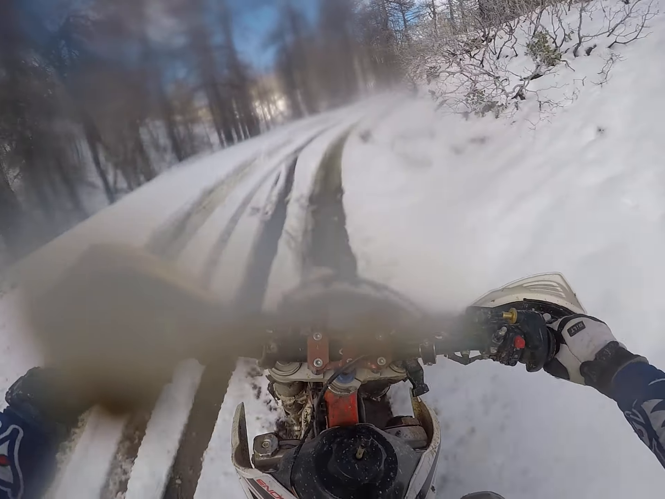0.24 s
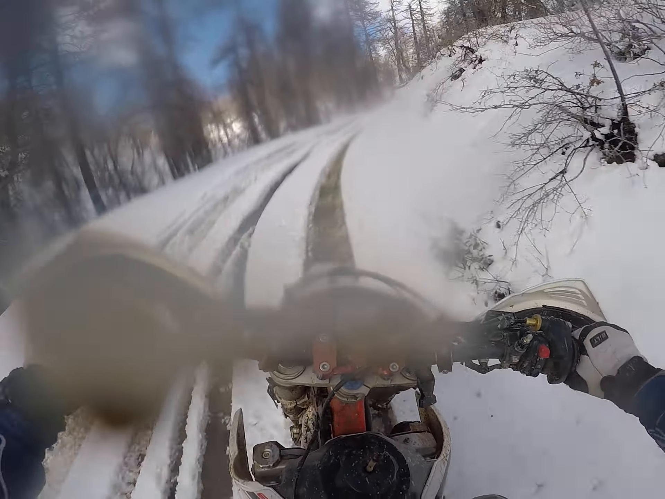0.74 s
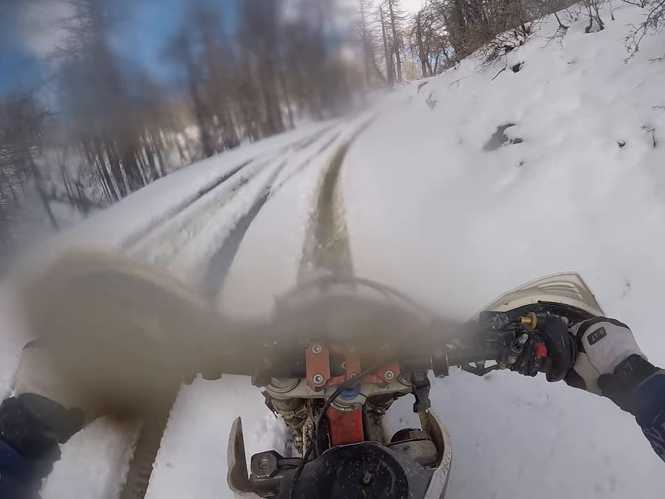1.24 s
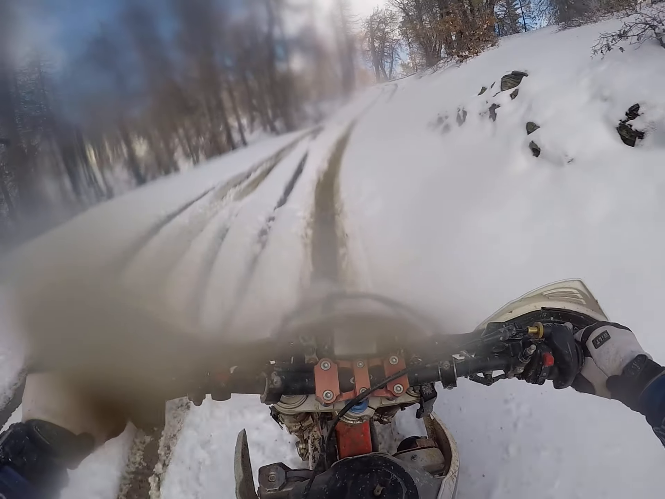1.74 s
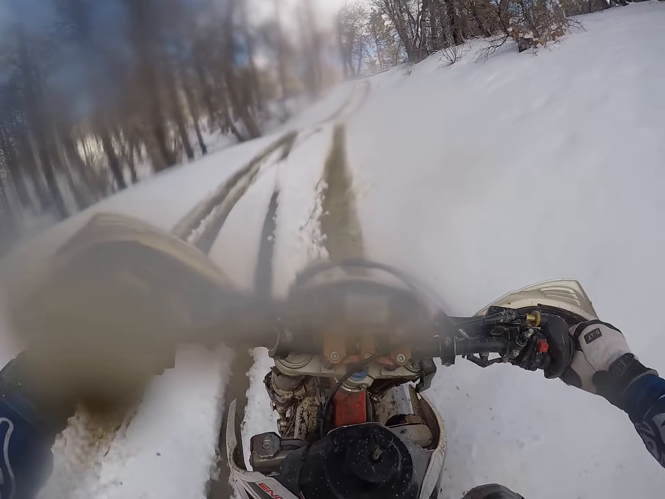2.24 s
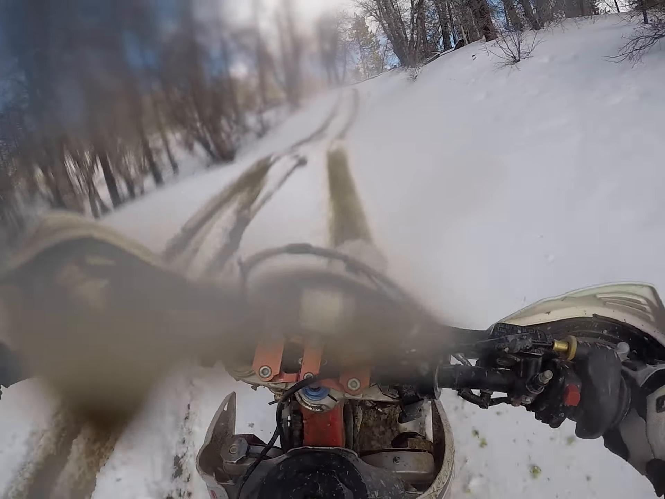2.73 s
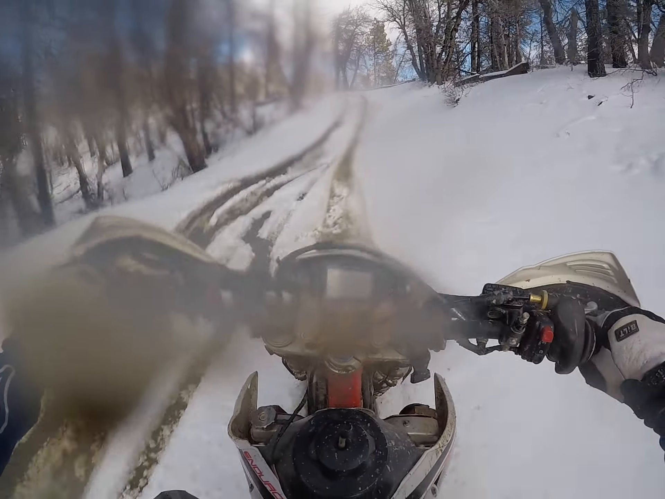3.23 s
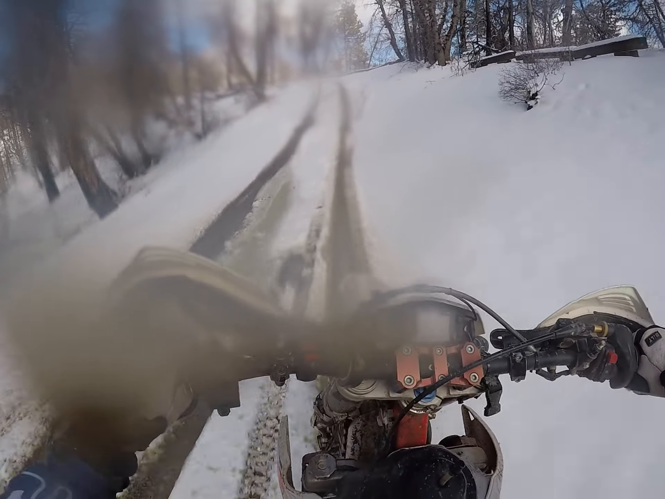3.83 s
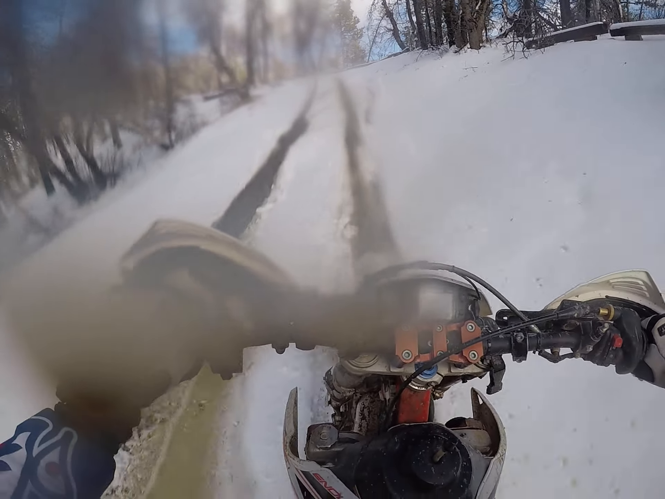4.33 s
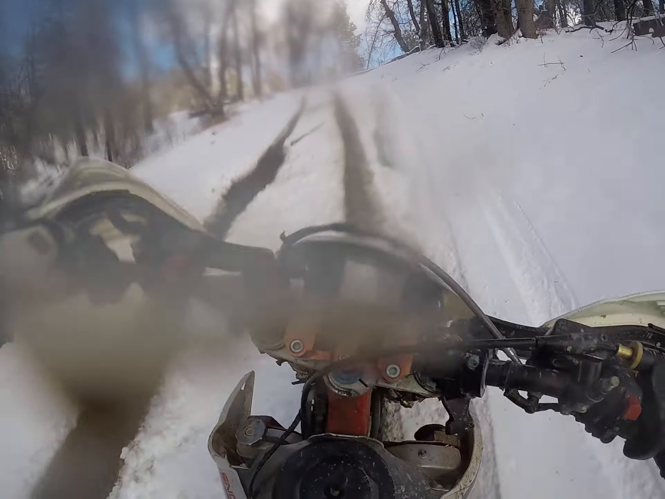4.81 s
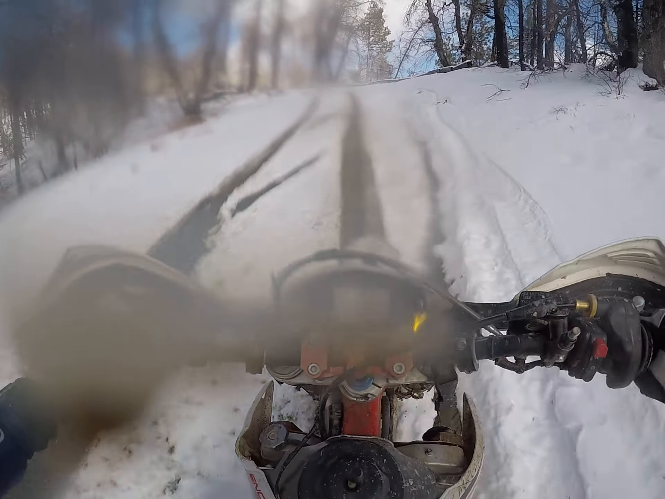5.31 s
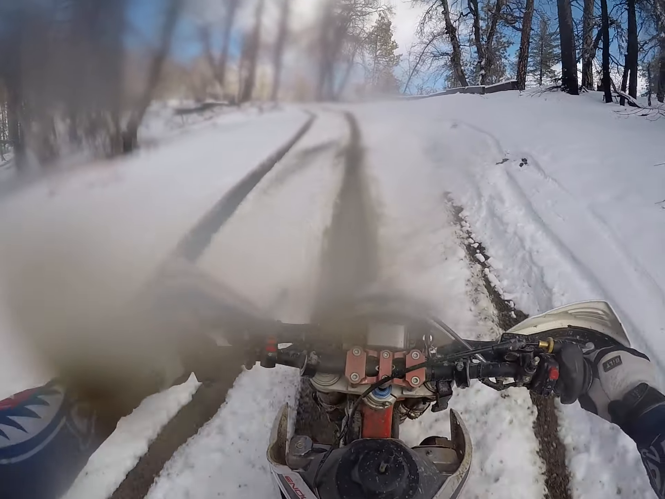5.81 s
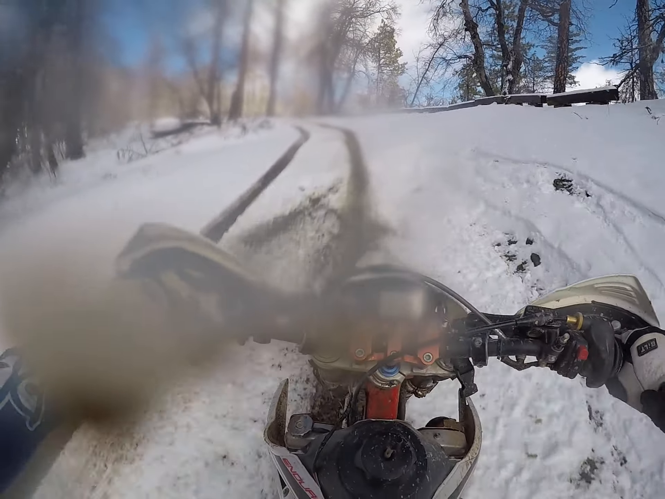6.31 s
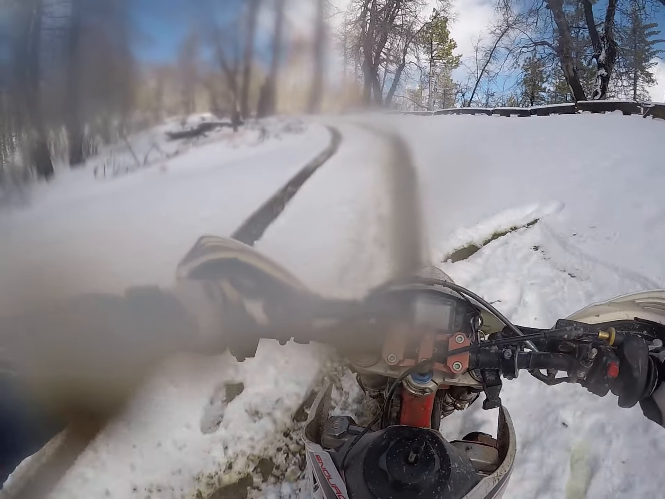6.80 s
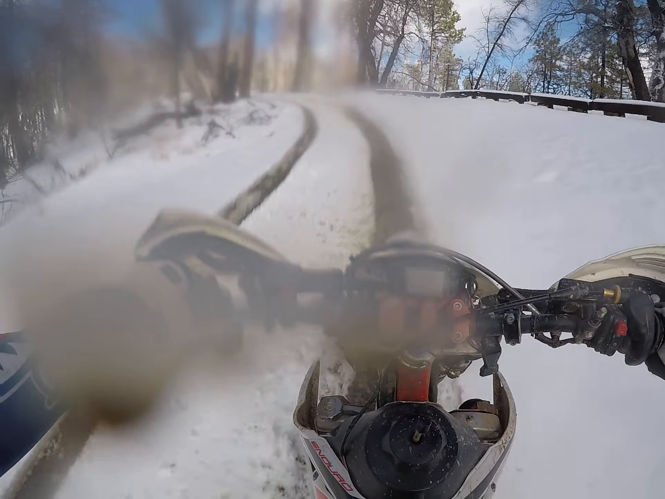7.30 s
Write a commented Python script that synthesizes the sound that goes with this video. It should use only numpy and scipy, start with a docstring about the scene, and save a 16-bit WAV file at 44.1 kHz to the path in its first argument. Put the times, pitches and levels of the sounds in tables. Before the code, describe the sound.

Close at the rider's helmet, a single-cylinder four-stroke dirt bike thuds along a snowy forest track. Hollow exhaust pulses run almost continuously over deep crank throb, with valve clatter, gassy hiss and faint metallic whine. Around two and a half seconds the throttle snaps with a honking intake and sharper cracks; another short snap comes near four and a half. Wind buffets low, and small grains of snow tick against the bike.

```python
"""A single-cylinder four-stroke trail bike pulls along a snowy track, heard at two helmet microphone ports.
Each firing is a set of decaying tone bursts: a valve thump, then a blast echoing in the header pipe,
with an airbox honk that rises on throttle snaps; slow sines add the crank throb.
Noise and random taps clatter and whine in the engine cases; thin, high, steady tones flicker in briefly.
Short bright noise bursts are snow spray, and lumpy low noise is wind buffeting the ports."""
import sys
import numpy as np
from scipy import signal
from scipy.fft import rfft, irfft, next_fast_len
from scipy.io import wavfile
from scipy.ndimage import uniform_filter1d, minimum_filter1d

SR = 44100
rng = np.random.default_rng(int(sys.argv[2]) if len(sys.argv) > 2 else 0)


def inscribe(sig):
    """Save sig as 16-bit PCM at rate SR to the path in sys.argv[1].

    A 1-D sig is mono; a 2-D sig holds one channel per row.
    Samples are clipped to [-1, 1] before scaling.
    """
    pcm = np.round(np.clip(np.atleast_2d(sig).T, -1, 1) * 32767)
    wavfile.write(sys.argv[1], SR, pcm.astype(np.int16))


N = 332955  # samples

# Engine speed. Each row: time in seconds, firings per second.
ENGINE_SPEED = [(0.0, 36.87), (0.16, 36.45), (0.32, 36.85), (0.4, 37.6), (0.48, 36.15), (0.76, 34.16),
                (0.92, 34.61), (1.24, 34.42), (1.32, 35.72), (1.64, 33.29), (1.76, 33.54), (1.88, 34.52),
                (2.24, 33.95), (2.44, 34.26), (2.52, 36.36), (2.6, 38.93), (2.68, 43.22), (2.76, 44.8),
                (2.88, 39.91), (2.96, 34.74), (3.08, 34.52), (3.16, 36.83), (3.24, 35.0), (3.36, 36.45),
                (3.48, 35.75), (3.56, 34.06), (3.68, 33.69), (3.76, 34.71), (3.88, 33.62), (4.08, 34.62),
                (4.28, 37.64), (4.44, 35.22), (4.56, 36.62), (4.64, 34.75), (4.68, 38.67), (4.72, 43.61),
                (4.76, 45.17), (4.84, 41.08), (4.92, 40.78), (5.16, 36.7), (5.24, 38.66), (5.4, 36.09),
                (5.52, 37.19), (5.6, 36.2), (5.8, 35.78), (5.88, 36.35), (5.96, 39.12), (6.08, 36.87),
                (6.16, 38.73), (6.36, 38.49), (6.52, 39.04), (6.6, 40.18), (6.8, 39.08), (6.88, 37.98),
                (7.08, 35.19), (7.2, 36.88), (7.36, 39.0), (7.55, 37.35)]


def amp(db):
    """Amplitude factor for a level in dB."""
    return 10 ** (np.asarray(db) / 20)


def rms_one(x):
    """Scale a signal to an rms of 1."""
    return x / np.sqrt(np.mean(x ** 2) + 1e-20)


def in_time(rows, t=None):
    """Columns of a curve table at times t (every sample by default)."""
    if t is None:
        t = np.arange(N) / SR
    s, *columns = np.transpose(rows)
    return [np.interp(t, s, column) for column in columns]


def at_hz(points, hz):
    """Read a curve over frequency, straight between its points on a log axis."""
    point_hz, values = np.array(points).T
    return np.interp(np.log(hz), np.log(point_hz), values)


def drift(rate_hz):
    """Slow random wander of spread 1: noise through two equal low-pass poles, made at SR / 40."""
    r = np.exp(-2 * np.pi * rate_hz * 40 / SR)
    settle = 2000
    white = rng.standard_normal(N // 40 + 2 + settle)
    slow = signal.lfilter([1], [1, -2 * r, r * r], white)[settle:]
    return np.interp(np.arange(N) / 40, np.arange(len(slow)), rms_one(slow))


def resonance(x, hz, width_hz):
    """Two-pole peak with gain 1 on top."""
    r = np.exp(-np.pi * width_hz / SR)
    zeros = np.array([1, 0, -1]) * (1 - r * r) / 2
    poles = [1, -2 * r * np.cos(2 * np.pi * hz / SR), r * r]
    return signal.lfilter(zeros, poles, x)


def banded_noise(spectrum, patchy_db, alike_share):
    """Third-octave bands of stereo noise with their own level, flicker and likeness; rms 1 overall."""
    # Left-right likeness before alike_share. Each row: frequency in Hz, correlation (below 0 counts as 0).
    likeness = [(25, 0.05), (60, 0.4), (180, 0.92), (530, -0.88), (1590, 0.031), (4730, 0.72),
                (14100, -0.75)]
    lowest, highest = spectrum[0][0], min(spectrum[-1][0], 16000)
    edges = lowest * 2 ** np.arange(0, np.log2(highest / lowest), 1 / 3)
    together = drift(2.9)
    white = rng.standard_normal((2, 2, N))  # neighbouring bands take turns with two noise pairs
    out = 0
    for k, (low, high) in enumerate(zip(edges, edges[1:])):
        band = signal.butter(2, [low, high], "band", fs=SR, output="sos")
        mid, side = signal.sosfilt(band, white[k % 2])
        hz = np.sqrt(low * high)
        alike = np.clip(alike_share * at_hz(likeness, hz), 0, 1)
        flicker_db = patchy_db * (0.81 * together + drift(18.0))
        stereo = np.sqrt(1 + alike) * mid + np.sqrt(1 - alike) * side * [[1], [-1]]
        out = out + amp(at_hz(spectrum, hz) + flicker_db) * stereo
    return rms_one(out)


def cycles():
    """Engine cycles turned at every sample; whole numbers fall on the blasts."""
    first_blast = .661  # share of a cycle before the first blast
    return np.cumsum(in_time(ENGINE_SPEED)[0]) / SR - first_blast


def moments(turn, at):
    """Times at which the crank passes a given share of each cycle."""
    count = np.arange(-2, int(turn[-1]) + 2) + at
    # cycles beyond either end run on at the end speeds
    before = np.minimum(count - turn[0], 0) / ENGINE_SPEED[0][1]
    after = np.maximum(count - turn[-1], 0) / ENGINE_SPEED[-1][1]
    return np.interp(count, turn, np.arange(N) / SR) + before + after


def wind():
    """Turbulence at the ports: lumpy low noise, mostly its own at each one."""
    # Colour of the buffeting. Each row: frequency in Hz, relative level per Hz in dB.
    colour = [(12, -6), (30, -8), (55, -7.5), (90, -8), (130, -5.5), (200, -8), (300, -11), (500, -36)]
    # Gusts. Each row: time in seconds, average wind level in dB.
    gusts = [(0, -18.5), (1, -20.5), (1.7, -20), (1.86, -17), (2.0, -22), (2.6, -23), (3, -25.5),
             (3.7, -21.5), (5, -25), (6, -25), (6.35, -22), (6.8, -21.5), (7.55, -23)]
    return amp(in_time(gusts)[0]) * banded_noise(colour, patchy_db=2.0, alike_share=0.44)


def spray():
    """Snow and grit flung against the bike: sudden bright noise bursts, unlike at the two ports."""
    # Each row: start in seconds, level at the onset in dB.
    hits = [(0.2635, -30), (2.149, -39), (2.6892, -35), (2.877, -34), (3.134, -27.5), (3.349, -42),
            (3.7, -38), (4.0492, -45), (6.9726, -45)]
    fall_ms = 8.6
    t = np.arange(N) / SR
    bursts = sum(amp(db) * (t > s) * np.exp(-1000 * np.abs(t - s) / fall_ms) for s, db in hits)
    return bursts * rms_one(resonance(rng.standard_normal((2, N)), hz=6460, width_hz=480))


def high_tones():
    """Thin, high, steady tones flicker in for short spells: noise in narrow, twice-filtered resonances."""
    # Spells of the tones. Each row: middle in seconds, length in seconds, level in dB.
    spells = [(0.348, 0.026, -54), (0.551, 0.017, -57), (1.597, 0.068, -56), (2.191, 0.017, -62),
              (2.848, 0.061, -58), (3.672, 0.1, -54), (3.751, 0.037, -48), (3.903, 0.035, -57),
              (4.0, 0.12, -63), (4.669, 0.043, -50)]
    # Tones. Each row: pitch in Hz, width of each filter in Hz, relative level in dB.
    tones = [(8260, 30, 9), (10780, 25, -5), (13100, 60, -17), (14750, 25, -19)]
    t, white = np.arange(N) / SR, rng.standard_normal(N)
    spell_level = sum(amp(db) * np.exp(-.5 * ((t - s) / (length / 2)) ** 2) for s, length, db in spells)
    tones_sum = 0
    for hz, width_hz, db in tones:
        tone = resonance(resonance(white, hz, width_hz), hz, width_hz)
        tones_sum = tones_sum + amp(db) * rms_one(tone)
    return spell_level * tones_sum


def valve_taps():
    """Dense taps of random size at random moments."""
    taps_per_s = 900
    taps = (rng.random(N) < taps_per_s / SR) * rng.standard_normal(N)
    return taps + 1e-18  # keeps the filters off denormal numbers


def whine():
    """Three case panels sing: dense taps in narrow resonances, each in its own spells."""
    # Each row: time in seconds, low, middle and high panel level in dB.
    spells = [(0, -52, -42.5, -50), (1, -50, -41.5, -48), (1.7, -47, -46, -43), (2.2, -48, -42, -44),
              (2.65, -55, -41, -52), (3.3, -55, -41.5, -50), (3.7, -45, -45, -48), (3.9, -44, -44, -43),
              (4.15, -43, -40.5, -47), (4.42, -42, -35.5, -47), (4.6, -42, -39, -43), (4.7, -57, -50, -60),
              (4.9, -48, -46, -53), (5.4, -47, -48, -48), (6.5, -46.5, -44, -46), (7.55, -53, -43, -50)]
    # Each row: panel pitch in Hz, width in Hz.
    panels = [(2260, 70), (2885, 65), (3520, 70)]
    out = 0
    for db, (hz, width_hz) in zip(in_time(spells), panels):
        waver_db = 1.5 * drift(2.5)
        out = out + amp(db + waver_db) * rms_one(resonance(valve_taps(), hz, width_hz))
    return out


def case_taps():
    """Valve taps striking the resonances of the engine cases, each wavering slowly."""
    # Each row: pitch in Hz, width in Hz, relative level in dB.
    case_modes = [(1726, 140, -9), (3114, 320, -13.5), (4085, 86, -15.5), (4446, 58, -14.5)]
    out = 0
    for hz, width_hz, db in case_modes:
        out = out + amp(db + 2.0 * drift(2.1)) * rms_one(resonance(valve_taps(), hz, width_hz))
    return out


def clatter(turn):
    """Gas hiss, valve taps and panel whine, all swelling in step with the crank."""
    # Colour of the hiss. Each row: frequency in Hz, relative level per Hz in dB.
    colour = [(240, -39), (400, -5), (477, -11), (561, -9), (823, -12), (1100, -7.5), (1460, -21.5),
              (2630, -18.5), (2880, -22.5), (6660, -23), (10400, -46), (12500, -79), (13500, -92)]
    # Level of hiss and taps before their own gains. Each row: time in seconds, level in dB.
    course = [(0, -33), (1.3, -32), (2.3, -32.5), (2.58, -30.5), (2.66, -32.5), (2.85, -31), (3.0, -33.5),
              (3.4, -31.5), (4.0, -31.5), (4.65, -31), (4.72, -35.5), (4.85, -31), (5.0, -34),
              (5.35, -31.5), (6.5, -32), (7.55, -33.5)]
    # Swell within the cycle. Each row: order, depth in dB, crest in cycles after the blast.
    swells = [(1, 1.5, -0.13), (2, 1.1, 0.1)]
    swell_db = sum(db * np.cos(2 * np.pi * order * (turn - crest)) for order, db, crest in swells)
    hiss = amp(5.8) * banded_noise(colour, patchy_db=1.12, alike_share=0.69)
    level = amp(in_time(course)[0])
    return amp(swell_db) * (level * (hiss + case_taps()) + whine())


def dull(x):
    """Steep roll-off at which hiss and spray stop, near 13.6 kHz."""
    return signal.sosfilt(signal.cheby2(8, 45, 13600, fs=SR, output="sos"), x)


def throb(turn):
    """Crank throb through the frame: the lowest orders, near sines that waver in strength."""
    # Each row: order, rms level in dB about which it wavers, crest in cycles after the blast.
    orders = [(1, -25.5, 0.32), (2, -24.5, 0.24), (3, -35, 0.19)]
    out = 0
    for order, db, crest in orders:
        level = np.sqrt(2) * amp(db + 0.5 * drift(2.4))
        out = out + level * np.cos(2 * np.pi * order * (turn - crest))
    return out


def rings(times, sizes, hz, rise_ms, fall_ms):
    """A tone burst cresting at each time: bell-shaped rise, then a fall with an exponential tail."""
    out = np.zeros(N + 2 * SR)  # a spare second at each end
    span = np.arange(-int(SR * rise_ms / 300), int(SR * fall_ms / 130))
    for t, size, f in zip(times, sizes, hz):
        i = int(t * SR) + span
        age = i / SR - t
        rise = np.exp(-.5 * (1000 * age / rise_ms) ** 2)
        fall = 1 / np.cosh(1000 * age / fall_ms)
        shape = np.where(age < 0, rise, fall)
        out[i + SR] += size * shape * np.cos(2 * np.pi * f * age)
    return out[SR:SR + N]


def part_levels(firings):
    """Level in dB of each exhaust and intake part at each firing, and the thump's delay in ms."""
    # Load on the engine. Each row: time in seconds, levels in dB of blast, first thump, airbox honk,
    # silencer ring and gas jet.
    load = [(0.02, -7.5, -9.5, -35, -21.5, -26.5), (0.45, -10.5, -12, -32, -27.5, -29.5),
            (0.51, -17.5, -10.5, -23, -26, -30), (0.71, -9.5, -13.5, -21, -22.5, -32),
            (0.88, -8.5, -8, -19, -20.5, -24.5), (1.06, -11, -11.5, -30, -22.5, -27),
            (1.29, -7.5, -5.5, -21.5, -28, -25.5), (1.46, -13.5, -8, -26, -23, -31),
            (1.75, -12.5, -10.5, -26.5, -27.5, -26), (2.05, -12, -6, -24, -26.5, -23.5),
            (2.22, -7.5, -10, -26, -21.5, -26), (2.51, -5.5, -4, -14.5, -38, -27),
            (2.64, -10, -3, -3.5, -36, -42), (2.74, -8, -8, -21.5, -20, -29),
            (2.8, -6, -3, -13, -20.5, -28.5), (2.88, -15.5, -16.5, -26, -23.0, -33),
            (2.96, -9, -13, -19, -18, -34), (3.27, -7.5, -2, -13.5, -24.5, -27.5),
            (3.32, -9.5, -8.5, -16, -25, -26.5), (3.61, -10.5, -9.5, -38.5, -16.5, -34),
            (3.9, -14.5, -7.5, -28, -25.5, -32), (4.07, -8, -5, -19, -19, -26.5),
            (4.19, -10.5, -3.5, -15, -23.5, -29.5), (4.55, -11, -9.0, -19.5, -19, -28.0),
            (4.71, -2.5, -3.5, 0.5, -31, -30), (4.75, -14.5, -7.0, -14, -22.5, -32.0),
            (4.8, -9, -19, -50, -23, -28.5), (4.9, -7, -12, -27, -25, -28.5),
            (5.07, -17.5, -10.5, -27, -32, -32), (5.23, -11, -10.5, -16.5, -21.5, -46),
            (5.42, -10, -5, -20, -27.5, -32.5), (5.69, -11.5, -6.5, -16.5, -25.5, -34.5),
            (5.94, -8.0, -12, -19, -23.5, -28.5), (6.15, -11, -3, -11, -29.0, -35),
            (6.38, -13.5, -7, -23, -22.5, -27), (6.54, -3.5, -8, -16, -23, -29),
            (6.66, -8.5, -6.5, -17, -24, -29), (6.84, -7.5, -5, -16, -24.5, -28.5),
            (6.92, -9.5, -16.5, -21, -23.5, -38.5), (7.2, -5, -4.5, -18.5, -23.5, -32),
            (7.33, -7.5, -6.5, -16, -27.5, -31.5), (7.46, -10, -10.5, -15.5, -23, -31.5)]
    # Sharp edge of the blast. Each row: time in seconds, crack level in dB, thump delay in ms.
    edge = [(0, -24, .1), (1, -23, .1), (2, -21, .1), (2.68, -22, -.1), (2.705, -10, -3.1),
            (2.83, -9, -3.1), (2.9, -14, -.1), (3.2, -22, .1), (4, -21, .1), (4.7, -22, .1),
            (4.77, -15, -.1), (5.0, -18, -.1), (5.3, -25, .1), (6.5, -27, .1), (7.1, -21, .1),
            (7.55, -24, .1)]
    part_db = dict(zip(["pipe", "thump", "honk", "silencer", "jet"], in_time(load, firings)))
    # a low boom comes up with the revs: 2.05 dB for each firing per second over the usual 36
    part_db["boom"] = -25 + 2.05 * (in_time(ENGINE_SPEED, firings)[0] - 36)
    part_db["crack"], thump_ms = in_time(edge, firings)
    return part_db, thump_ms


def exhaust(turn):
    """Pipe, port, silencer and airbox ring at set points of the cycle, a little different each firing."""
    # Rings of one cycle, in order: valve crack, airbox gulp, first thump down the pipe, jet in the port,
    # its ring-on, steep front, main blast, silencer chamber, inverted echo from the open end,
    # jet in the header bend, long section of the pipe, late suction.
    # Each row: cycles after the blast, further delay in ms, pitch in Hz before shifts, rise in ms, fall in ms,
    # level in dB over its part, signed crest factor, part.
    ring_rows = [(-.33, 2.5, 1100, 1.0, 1.9, 5, -1, "jet"), (-0.3963, 0.5, 259.6, 4.1, 21.5, -3, 1, "honk"),
                 (-0.2995, 3, 265.3, 0.62, 5.1, -0.5, 1, "thump"), (-.04, -0.9, 985, 0.9, 2.1, 8, 1, "jet"),
                 (0.01, 2.5, 1150, 1.2, 2.5, 4, 1, "jet"), (0.005, 0.4, 420, 0.7, 0.85, 0, -1, "crack"),
                 (0.0081, 0.5, 271, 1.05, 3.18, -2.5, -1.26, "pipe"),
                 (-0.0046, 0.75, 473.5, 1.9, 4.5, 9, -0.7, "silencer"),
                 (0.0015, 6, 265, 3.16, 1.62, 0.5, 0.91, "echo"),
                 (-0.0527, 2.5, 352, 5.8, 3.5, 5.5, -1.02, "jet"),
                 (-0.011, 3, 224, 3, 4.1, -1, -1.4, "boom"), (0.512, 1, 150, 3.4, 2.5, -14, -1.56, "pipe")]
    # Throttle snaps. Each row: time in seconds, pipe echo over the blast in dB, airbox pitch shift as a share.
    throttle = [(0, -0.5, 0.0031), (1.5, -0.5, -0.007), (2.5, -1.5, .01), (2.62, -0.5, .06),
                (2.68, 1, -0.024), (2.82, -1, -0.027), (2.88, -9, 0), (2.98, -2, -0.015), (3.6, -1, 0),
                (4.62, 1.5, 0.025), (4.7, -2, -0.043), (4.76, -6.5, -0.027), (5.05, -1.5, 0),
                (5.25, 0, .01), (6.15, 1, 0.012), (6.7, 0.5, 0.029), (7.1, -1.5, -0.015),
                (7.55, -0.5, 0.023)]
    # The jet's ring in the port moves. Each row: time in seconds, pitch in Hz that shifts it against the usual.
    jet_pitch = [(0.0, 1060), (1.74, 1020), (3.47, 1070), (3.53, 1020), (4.67, 1050), (4.84, 1000),
                 (5.19, 1070), (5.64, 1060), (5.78, 997), (5.91, 1050), (6.86, 1080), (6.92, 1030),
                 (7.49, 1070), (7.55, 1040)]
    jet_usual_hz = 1050
    scatter_db, jet_scatter_db = 1.15, 2.5  # the turbulent jet varies more from firing to firing
    jitter_ms, wobble_ms = .07, .1  # of one ring, of the whole firing
    wander_db = 1.0  # slow change in the strength of each ring

    firings = moments(turn, 0)
    firing_samples = np.clip(firings * SR, 0, N - 1).astype(int)
    part_db, thump_ms = part_levels(firings)
    echo_db, honk_shift = in_time(throttle, firings)
    part_db["echo"] = part_db["pipe"] + echo_db
    jet_shift = in_time(jet_pitch, firings)[0] / jet_usual_hz - 1
    wobble = rng.standard_normal(len(firings))
    out = 0
    for at, ms, hz, rise_ms, fall_ms, db, sign, part in ring_rows:
        strength, late, pitch = rng.standard_normal((3, len(firings)))
        wander = drift(0.85)[firing_samples]
        port_jet = part == "jet" and hz > 900  # the lower jet ring sits in the header bend
        chance_db = (jet_scatter_db if port_jet else scatter_db) * strength + wander_db * wander
        sizes = sign * amp(part_db[part] + db + chance_db)
        delay_ms = ms + thump_ms * (part == "thump") + jitter_ms * late + wobble_ms * wobble
        times = moments(turn, at) + delay_ms / 1000
        shift = honk_shift * (part == "honk") + jet_shift * port_jet
        pitches = hz * (1 + shift + .004 * pitch + .005 * wander)
        out = out + rings(times, sizes, pitches, rise_ms, fall_ms)
    return out


def scene():
    """All sources at the two ports."""
    turn = cycles()
    engine = exhaust(turn) + throb(turn)
    return engine + dull(clatter(turn) + spray()) + high_tones() + wind()


def record(dry):
    """Two unlike ports (the left one fuller in the lows and later), a peak limiter, the top cut."""
    # Each row: frequency in Hz, left minus right level in dB.
    port_db = [(30, 4.5), (60, 8.5), (120, 2.5), (230, 4), (460, -0.5), (920, -7.5), (1820, -5.5),
               (3600, -2), (7130, 3), (14100, -10.5)]
    # Each row: frequency in Hz, phase in radians by which the left leads.
    port_lead = [(20, 0), (300, -.6), (600, -1.0), (1210, -6.6), (3450, -6.3), (7400, -10), (14000, -13)]
    limit, cutoff_hz = .98, 14800
    size = next_fast_len(N + 4096)
    hz = np.maximum(np.arange(size // 2 + 1) * SR / size, 1)
    # each port takes half of the difference
    half = amp(at_hz(port_db, hz) / 2) * np.exp(.5j * at_hz(port_lead, hz))
    ports = irfft(rfft(dry, size) * np.array([half, 1 / half]), size)[:, :N]
    needed = np.minimum(1, limit / (np.abs(ports).max(axis=0) + 1e-9))
    gain = uniform_filter1d(minimum_filter1d(needed, size=441), size=441)  # hold and smooth over 10 ms each
    top_cut = signal.ellip(12, .5, 70, cutoff_hz, fs=SR, output="sos")
    return signal.sosfilt(top_cut, gain * ports)


dry = scene()
out = record(dry)
inscribe(out)
```